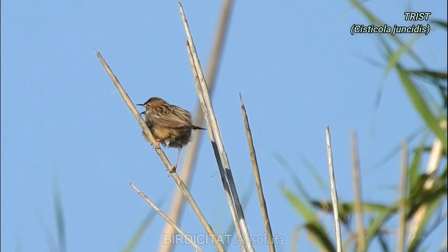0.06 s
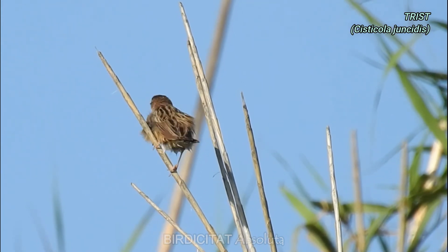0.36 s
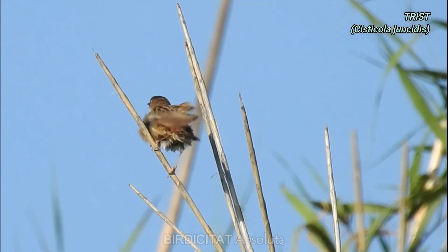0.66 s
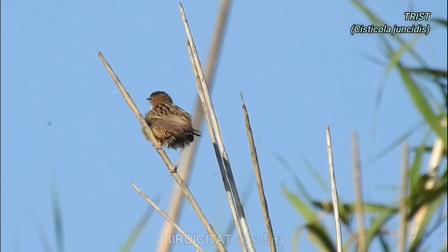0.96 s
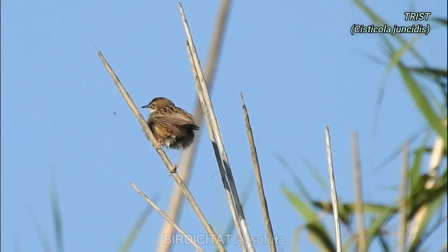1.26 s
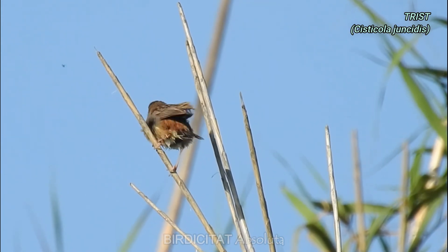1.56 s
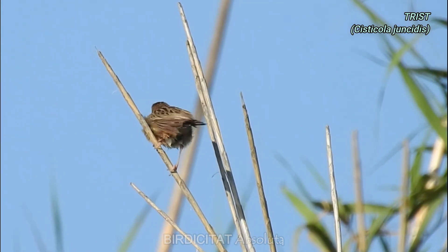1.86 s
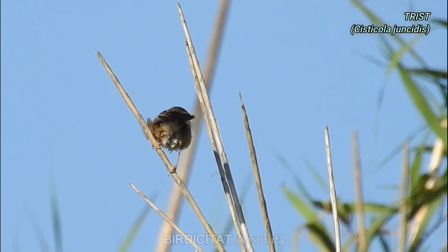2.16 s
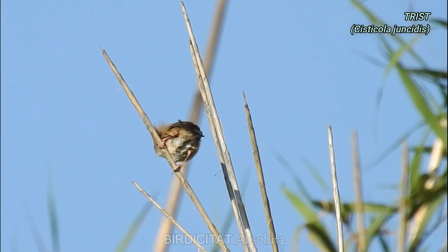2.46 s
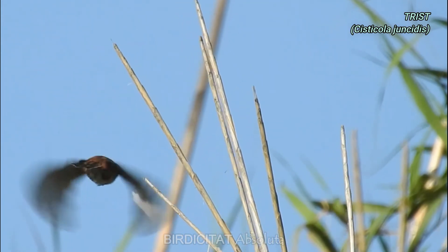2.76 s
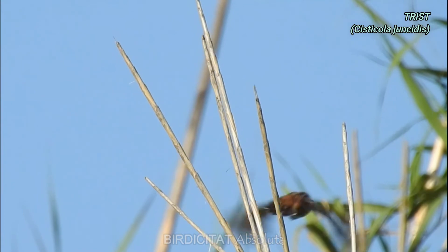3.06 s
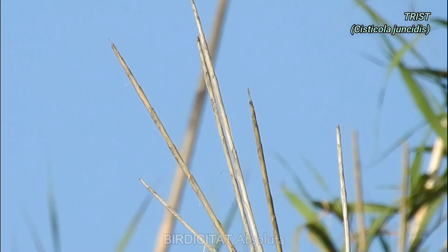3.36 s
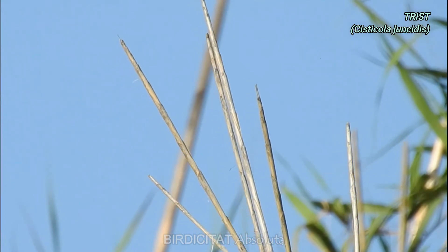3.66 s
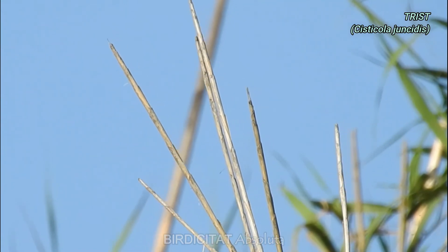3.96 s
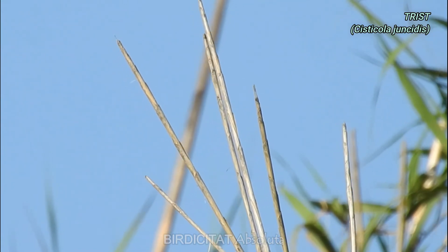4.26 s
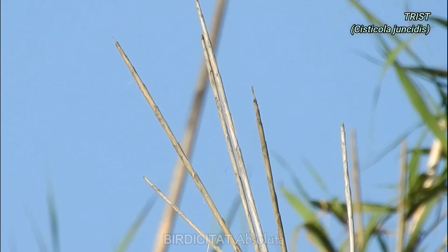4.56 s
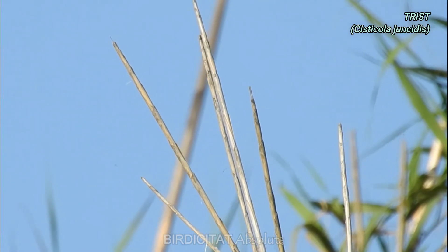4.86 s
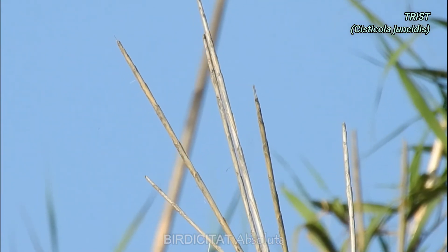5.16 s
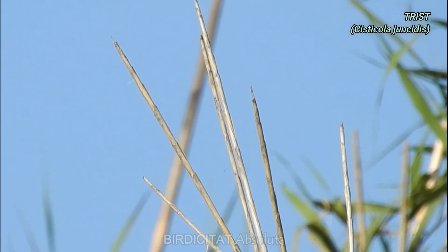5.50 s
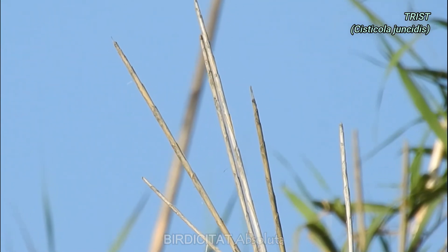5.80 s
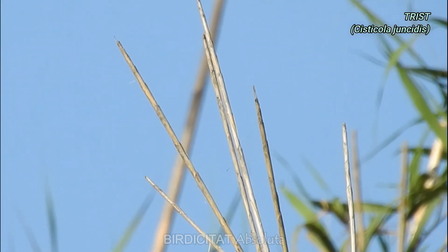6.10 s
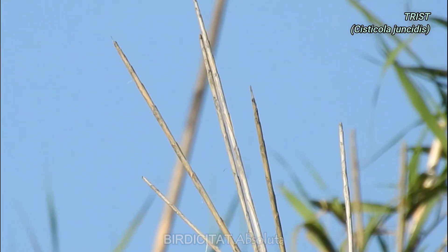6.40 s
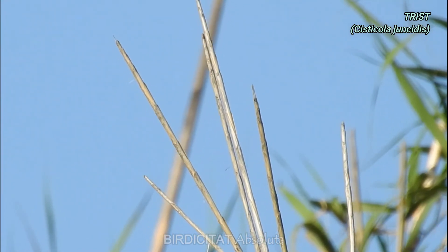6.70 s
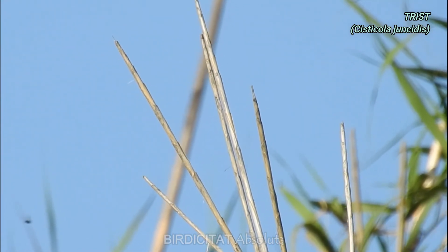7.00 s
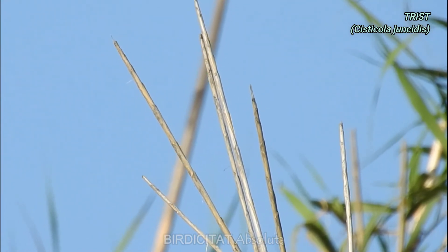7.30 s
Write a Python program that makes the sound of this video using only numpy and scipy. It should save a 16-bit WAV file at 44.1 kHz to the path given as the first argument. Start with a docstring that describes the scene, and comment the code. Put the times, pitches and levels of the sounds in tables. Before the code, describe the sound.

A small bird close to the microphone in a reed bed gives eight sharp, very high calls, each a quick tick running into a tiny falling whistle. The first three are widely spaced, then they come about twice as often and soften slightly. A second bird gives harsh chips at the start. Farther off, other birds chirp, buzz and whistle over a very faint distant rush in still air.

```python
"""A small bird in a reed bed, close to the microphone, gives eight sharp high calls: two ticks, then
an arched whistle that falls away, sung with both sides of the syrinx. Farther off, other birds chip,
chirp, buzz and whistle. The reed stems scatter every call into a short tail, different on the left
and right. Behind it all lie a faint distant rush, a thin hum and still air."""
import sys
import numpy as np
from scipy import signal
from scipy.fft import rfft, irfft, next_fast_len
from scipy.io import wavfile
from scipy.ndimage import uniform_filter1d, map_coordinates

SR = 44100
rng = np.random.default_rng(int(sys.argv[2]) if len(sys.argv) > 2 else 0)


def log_audio(samples):
    """Write samples as a 16-bit WAV file to the path given in sys.argv[1]."""
    # one column per channel
    frames = np.atleast_2d(samples).T
    # limit to full scale, then quantise
    limited = np.clip(frames, -1, 1)
    pcm = np.round(limited * 32767).astype(np.int16)
    wavfile.write(sys.argv[1], SR, pcm)


N = 323694

# spectra of the distant rush and of the air at the microphone: (frequency [Hz], relative density [dB])
RUSH_SPECTRUM = [(210, -44), (350, -15.5), (432, -28.5), (568, -14), (920, -7.5), (958, -3.5), (1340, -1.5),
                 (1980, -11.5), (2400, -15.5), (3120, -37.5), (5280, -120)]
AIR_SPECTRUM = [(20, -20), (50, 0.5), (70, -2.5), (115, -13.5), (175, -1.5), (230, -9.5), (500, -12.5),
                (2000, -6.5), (4300, -4.5), (6500, -6.5), (9500, -11), (12000, -15), (15500, -21.5)]
# how alike the noise is left and right: (frequency [Hz], correlation [0-1])
STEREO_LIKENESS = [(60, .45), (130, .6), (290, .84), (650, .91), (1430, .85), (3170, .45), (7010, .1)]
# surges of the rush: (crest time [s], rise [s], fall [s], level [dB])
RUSH_SURGES = [(.47, 0.49, .2, -59.5), (1.52, 0.23, 0.24, -71), (2.75, 0.28, 0.29, -77),
               (4.051, 0.28, .45, -74.5), (5.68, 0.098, .45, -71.5)]
# soft low swells: (time [s], width [s], centre [Hz], level [dB])
LOW_SWELLS = [(.22, .13, 150, -77), (1.63, .11, 407.3, -79.5)]
# the hum's two tones: (pitch [Hz], level [dB])
HUM_TONES = [(990, -83), (1487, -80.5)]
# the tail scattered by the stems: (delay [s], relative level [dB])
REED_TAIL = [(.003, 4), (.015, -3), (.04, -9), (.08, -14.5), (.15, -19.5), (.22, -27.5), (.32, -49.5),
             (.4, -57.5)]
# far buzzes: (time [s], length [s], pitch [Hz], swing [Hz], level [dB], low voice's gain [0-1],
# low voice's pitch drop [share])
BUZZES = [(.0, 0.035, 4830, 595, -55.5, 0.4, 0.1), (0.489, 0.044, 3500, 346, -47.5, 0, 0),
          (0.867, 0.12, 5000, 800, -42.5, 0.35, 0.3), (1.678, 0.18, 4800, 892, -53.5, 0, 0),
          (2.889, .17, 4714, 720, -54, 0.02, 0), (4.239, .11, 4964, 821, -39.5, 0.57, 0.3),
          (4.324, .16, 5650, 1157, -46, 0.1, 0), (4.408, .185, 4610, 521, -40.5, 0.01, 0.063),
          (5.613, .19, 4300, 517.9, -54, 0.11, 0.28)]
# two far slurred whistles: (time [s], pitch [Hz], level before gain [dB])
SINKING_SLUR = [(0.17, 2759, -82.5), (0.178, 2778, -73.5), (0.214, 2719, -60.5), (0.236, 2881, -57),
                (0.296, 2416, -57.5), (0.345, 2307, -60.5)]
ARCHED_SLUR = [(2.785, 4682, -68.5), (2.799, 5174, -54), (2.833, 5850, -63.5), (2.889, 5948, -60),
               (2.915, 5603, -51), (2.923, 5327, -45), (2.941, 4734, -49), (2.975, 4109, -51.5)]
# far chirps: (time [s], length [s], start pitch [Hz], end pitch [Hz], level [dB], upper voice [0-1])
CHIRPS = [(0.065, 0.0053, 3480, 2800, -48, 0), (.115, .057, 4360, 4450, -66, .3),
          (0.786, 0.027, 4390, 4920, -41.5, 0.04), (.807, 0.0072, 2800, 5200, -42, 0.11),
          (1.136, 0.051, 3610, 3160, -62, 0), (1.428, 0.069, 6250, 5610, -60, 0.01),
          (1.631, 0.054, 3086, 3410, -62, .7), (2.044, 0.011, 5000, 5900, -46, 0.05),
          (2.203, 0.027, 2680, 3426, -54, 0), (2.392, .08, 5520, 4680, -71, 0),
          (2.661, 0.067, 2576, 3630, -58, 0.05), (2.719, 0.064, 3277, 3330, -65.5, 0.14),
          (3.123, 0.046, 3450, 3449, -61, 0.23), (3.603, 0.076, 3480, 3450, -63.5, 0.83),
          (3.751, .15, 4150, 4050, -68, 0.4), (4.005, .07, 3840, 3040, -59.5, 0.64),
          (4.087, 0.047, 3330, 4520, -54, .5), (4.697, .016, 4010, 4720, -47, 0.02),
          (4.767, 0.018, 3555, 2358, -55.5, 0.08), (5.02, 0.041, 3630, 3160, -63, 0.4),
          (5.28, .07, 4230, 3396, -67.5, 0.27), (5.429, 0.12, 3090, 3580, -66, 0.37),
          (5.991, 0.056, 4060, 3330, -63.5, 0.01), (6.045, 0.056, 3300, 3090, -59.5, 0.1),
          (7.075, .05, 4560, 4550, -52.5, 0.08)]
# fainter chirps arrive with more scatter: (chirp level [dB], scatter over direct sound [dB])
CHIRP_SCATTER = [(-66, 2.5), (-51, -0.5), (-44.5, -3.5)]
# a second bird's harsh chips: (time [s], throat resonance [Hz], level [dB])
CHIPS = [(0.04, 4710, -29), (0.073, 4660, -27), (0.381, 4570, -33), (.420, 4600, -31.5), (0.546, 4630, -31),
         (0.5948, 4510, -30.5), (0.6424, 4430, -35), (0.672, 3820, -40), (.694, 3840, -44)]
# the near bird's calls: (whistle onset [s], length [s], top pitch [Hz], tick [dB], attack [dB],
# hold [dB], fall [dB], left over right [dB])
NEAR_CALLS = [(0.33, 0.062, 7418, -12, -15, -18.5, -13, .9),
              (1.884, 0.062, 7482, -13, -11.5, -19, -11.5, 1), (3.4497, 0.063, 7292, -14, -12, -18, -16, 1),
              (4.160, 0.061, 7408, -13.5, -15, -21.5, -14.5, 0.3),
              (4.908, 0.059, 7370, -18, -17, -22.5, -16.5, .5),
              (5.574, .061, 7396, -17.5, -15.5, -23.5, -17, .2),
              (6.292, 0.062, 7433, -21, -15.5, -26.5, -18.5, 0),
              (7.044, .061, 7330, -17, -14.5, -28.5, -21, -1.5)]
# its tick: (time from centre [s], pitch over top pitch [ratio], relative level [dB])
TICK_SHAPE = [(-.0026, .56, -48), (-.0013, .76, -11), (-.0004, .93, -2), (.0006, .965, -1.5),
              (.0019, .89, -4.5), (.0027, .8, -18.5), (.004, .72, -50)]
# its whistle, before stretching to each call's length: (time [s], pitch over top pitch [ratio])
WHISTLE_ARCH = [(-.0014, .54), (0, .82), (.001, .968), (.004, .955), (.011, 1.0), (.025, .992), (.04, .97),
                (.047, .918), (.054, .835), (.061, .76)]
# the syrinx's other side falls earlier: (time [s], pitch over top pitch [ratio], level over hold [dB])
SECOND_VOICE = [(.02, .96, -38.5), (.029, .88, -18), (.037, .82, -15.5), (.044, .77, -18.5),
                (.052, .7, -35.5)]


def amp(db):
    """Decibels to amplitude."""
    return 10 ** (np.asarray(db) / 20)


def along(points, hz):
    """Read (Hz, value) points on a log frequency axis."""
    knots_hz, values = np.transpose(points)
    return np.interp(np.log(hz + 1), np.log(knots_hz + 1), values)


def curves(rows, t):
    """Each column after the first, read at t."""
    times, *columns = np.transpose(rows)
    return [np.interp(t, times, column) for column in columns]


def wobble(t, rate):
    """A smooth random curve, rate knots a second."""
    return map_coordinates(rng.standard_normal(2048), [(t - t[0]) * rate], mode='wrap')


def filtered(x, response):
    """Filter x by a gain that depends on frequency."""
    size = next_fast_len(N + SR // 2)
    return irfft(rfft(x, size) * response(np.fft.rfftfreq(size, 1 / SR)), size)[..., :N]


def tone(hz):
    """A sine that follows a pitch curve."""
    return np.sin(2 * np.pi * np.cumsum(hz) / SR)


def add(track, s, sound):
    """Mix a stereo sound in at time s."""
    part = track[:, max(round(s * SR), 0):][:, :sound.shape[1]]
    part += sound[:, :part.shape[1]]


def noise(spectrum):
    """Coloured stereo noise of rms 1, most alike left and right in the midrange."""
    def mid_side_gains(hz):
        angle = np.arccos(np.clip(along(STEREO_LIKENESS, hz), -1, 1)) / 2
        return amp(along(spectrum, hz)) * [np.cos(angle), np.sin(angle)]
    mid, side = filtered(rng.standard_normal((2, N)), mid_side_gains)
    stereo = np.array([mid + side, mid - side])
    return stereo / np.sqrt(np.mean(stereo ** 2) + 1e-20)


def background(steady_db=-75.5, flutter_db=1.4):
    """A fluttering distant rush, two low swells and a wavering hum, all slightly left, in still air."""
    t = np.arange(N) / SR
    surges = [amp(db) * np.exp(-((t - s) / np.where(t < s, rise, fall)) ** 2)
              for s, rise, fall, db in RUSH_SURGES]
    strength = np.sqrt(amp(steady_db) ** 2 + np.sum(np.square(surges), axis=0))
    rush = strength * amp(flutter_db * wobble(t, 7)) * noise(RUSH_SPECTRUM)
    swells = 0
    for s, width, hz, db in LOW_SWELLS:
        band = noise([(hz / 2, -20), (hz, 0), (2 * hz, -12), (6 * hz, -45)])
        swells += amp(db) * np.exp(-((t - s) / width) ** 2) * band
    hum = sum(amp(db + 2.2 * wobble(t, 4.8)) * tone(hz * (1 + .0036 * wobble(t, 6)))
              for hz, db in HUM_TONES)
    return (rush + hum + swells) * amp([[.6], [-.6]]) + amp(-73.5) * noise(AIR_SPECTRUM)


def among_reeds(sound, wet_db, side_db, fade_db_per_s=0):
    """A call reaches the microphone directly, then scattered from countless stems."""
    t = np.arange(SR * 2 // 5) / SR
    tail = amp(curves(REED_TAIL, t)[0] - fade_db_per_s * t) * (t > .002)
    mid, side = rng.standard_normal((2, len(t))) * tail / np.linalg.norm(tail)
    paths = amp(wet_db) * np.array([mid + amp(side_db) * side, mid - amp(side_db) * side])
    paths[:, 0] = 1  # the direct path
    return signal.fftconvolve(sound[None], paths, axes=1)


def far_voice(t, pitch, db, rough, rasp_db):
    """A far bird's slightly unsteady whistle, with raspy partials beside it."""
    pitch = pitch * (1 + rough * wobble(t, 700))
    rasp = tone(pitch * 2 / 3) + tone(pitch * 4 / 3) + .4 * tone(pitch * 5 / 3)
    return amp(db + 2.9 * wobble(t, 180)) * (tone(pitch) + amp(rasp_db) * rasp)


def glide(length, start_hz, end_hz, db, bow, swing_hz, rough, rasp_db, sweeps_per_s=82):
    """A note swells and fades while its pitch glides along a bow, swept up and down by swing_hz."""
    t = np.arange(max(int(length * SR), 16)) / SR
    progress = t / t[-1]
    arc = np.abs(np.sin(np.pi * progress))
    pitch = (start_hz + (end_hz - start_hz) * progress) * (1 + bow * arc)
    sweep = swing_hz * np.sin(2 * np.pi * sweeps_per_s * t + .77 * wobble(t, 70))
    return arc ** .48 * far_voice(t, pitch + sweep, db, rough, rasp_db)


def distant_chatter(count=50):
    """Many birds twitter at the edge of hearing, mostly scatter."""
    out = np.zeros((2, N))
    for when, span, height, bend, loud in rng.random((count, 5)):
        hz = 2700 + 2400 * height
        note = glide(.044 + .07 * span, hz, hz * (.86 + .45 * bend), -83.5 + 5 * loud,
                     bow=.055, swing_hz=240, rough=.03, rasp_db=-18.5)
        add(out, when * N / SR, among_reeds(note, wet_db=10.5, side_db=-3.5))
    return out


def buzzing_birds(sag=.09):
    """Far whistles sweep quickly up and down and sag; in the harsh ones a low voice lingers beneath."""
    out = np.zeros((2, N))
    throat = signal.butter(4, 6500, fs=SR, output='sos')  # a small throat dulls the low voice
    for s, length, hz, swing_hz, db, low_gain, drop in BUZZES:
        high = glide(length, hz * (1 + sag / 2), hz * (1 - sag / 2), db,
                     bow=0, swing_hz=swing_hz, rough=.041, rasp_db=-27.5)
        add(out, s, among_reeds(high, wet_db=-2, side_db=-.5, fade_db_per_s=29.5))
        for harmonic, partial_db in [(1, -2), (2, -4)]:
            start_hz = harmonic * hz * .77
            low = glide(1.7 * length, start_hz, start_hz * (1 - drop), db + partial_db,
                        bow=0, swing_hz=harmonic * swing_hz * .52, rough=.04, rasp_db=-21)
            low = low_gain * signal.sosfilt(throat, low)
            add(out, s, among_reeds(low, wet_db=-1, side_db=-2, fade_db_per_s=37))
    return out


def slurred_whistle(path, gain_db, rough, wet_db):
    """One long far whistle follows a path of pitch and level."""
    out, t = np.zeros((2, N)), np.arange(path[0][0], path[-1][0], 1 / SR)
    pitch, db = curves(path, t)
    note = far_voice(t, pitch, db + gain_db, rough, rasp_db=-37) * signal.windows.tukey(len(t), .1)
    add(out, t[0], among_reeds(note, wet_db, side_db=1.5, fade_db_per_s=18.5))
    return out


def chirping_birds(upper_ratio=1.17):
    """Two-voiced chirps from deeper in the reeds, each one bowed glide."""
    out = np.zeros((2, N))
    for s, length, start_hz, end_hz, db, upper_gain in CHIRPS:
        wet_db, = curves(CHIRP_SCATTER, db)
        note = sum(gain * glide(length, ratio * start_hz, ratio * end_hz, db,
                                bow=.06, swing_hz=0, rough=.018, rasp_db=-31)
                   for ratio, gain in [(1, 1), (upper_ratio, upper_gain)])
        chirp = among_reeds(note, wet_db, side_db=-1, fade_db_per_s=12)
        add(out, s, chirp / np.hypot(1, amp(wet_db)))
    return out


def chipping_bird():
    """In the middle distance, abrupt stacks of harmonics fall fast through one throat resonance."""
    out, t = np.zeros((2, N)), np.arange(SR // 40) / SR
    blow_db, = curves([(0, -24), (.0015, -1.5), (.006, -4.5), (.011, -8), (.018, -22), (.025, -40)], t)
    for s, throat_hz, db in CHIPS:
        pitch = (780 + 850 * np.exp(-t / .0098)) * (1 + .024 * wobble(t, 450))
        throat = lambda hz: 1 / (1 + ((hz - throat_hz) / 480) ** 2) / (1 + (hz / 7200) ** 20)
        chip = amp(db + blow_db) * sum(tone(k * pitch) * throat(k * pitch) for k in range(2, 8))
        add(out, s, among_reeds(chip, wet_db=-2.5, side_db=-3.5, fade_db_per_s=14.5))
    return out


def tick(t, top_hz, db):
    """A few milliseconds of tone, flicked up and down in pitch around t = 0."""
    ratio, shape_db = curves(TICK_SHAPE, t)
    opening = amp(db + shape_db) * (t > TICK_SHAPE[0][0]) * (t < TICK_SHAPE[-1][0])
    return uniform_filter1d(opening, size=20) * tone(top_hz * ratio)


def arched_whistle(t, length, top_hz, attack_db, hold_db, fall_db):
    """One side of the syrinx arches and swells as it falls; the other side falls earlier."""
    age = t * .061 / length  # the shapes span a 61 ms whistle
    effort = [(-.0025, -81.5), (-.0008, attack_db - 21.5), (.0005, attack_db), (.004, attack_db - 2.5),
              (.01, hold_db - 2), (.028, hold_db - .5), (.04, hold_db), (.0475, fall_db),
              (.054, fall_db - .5), (.059, fall_db - 6.5), (.062, fall_db - 18), (.066, -79.5)]
    pitch = top_hz * curves(WHISTLE_ARCH, age)[0] * (1 + .003 * wobble(t, 500))
    envelope = uniform_filter1d(amp(curves(effort, age)[0] + .72 * wobble(t, 250)), size=20)
    second_ratio, second_db = curves(SECOND_VOICE, age)
    second_open = (age > SECOND_VOICE[0][0]) * (age < SECOND_VOICE[-1][0])
    return envelope * tone(pitch) + amp(hold_db + second_db) * second_open * tone(top_hz * second_ratio)


def side_tones(voice, t, shift_hz=3877):
    """Faint copies of the call's high part sound one shift below it, and one and two shifts above."""
    hz = np.fft.rfftfreq(len(t), 1 / SR)
    high = irfft(rfft(voice) / (1 + (5700 / (hz + 1)) ** 20), len(t))
    shift = np.exp(2j * np.pi * shift_hz * t)
    copies = amp(-35) / shift + amp(-38.5) * shift + amp(-49) * shift ** 2
    return np.real(signal.hilbert(high) * copies)


def near_bird():
    """Close to the microphone: a soft tick, a loud tick, then the two-voiced whistle."""
    out, t = np.zeros((2, N)), np.arange(-SR // 20, SR // 12) / SR
    for s, length, top_hz, tick_db, attack_db, hold_db, fall_db, pan_db in NEAR_CALLS:
        voice = tick(t + .0362, top_hz, tick_db - 19.5) + tick(t + .0188, top_hz, tick_db)
        voice += arched_whistle(t, length, top_hz, attack_db, hold_db, fall_db)
        call = among_reeds(voice, wet_db=-9.5, side_db=-1)
        call += among_reeds(side_tones(voice, t), wet_db=-4, side_db=-3.5)
        add(out, s + t[0], call * amp([[pan_db / 2], [-pan_db / 2]]))
    return out


def scene():
    """The reed bed from one spot: the near bird over the farther birds and the background."""
    slurs = slurred_whistle(SINKING_SLUR, gain_db=3.5, rough=.011, wet_db=-4.5)
    slurs += slurred_whistle(ARCHED_SLUR, gain_db=0, rough=.0195, wet_db=1)
    birds = near_bird() + chipping_bird() + chirping_birds() + slurs + buzzing_birds()
    return birds + distant_chatter() + background()


def record(dry):
    """The recorder keeps nothing above its band limit."""
    limit_hz = 15700
    return filtered(dry, lambda hz: 1 / (1 + (hz / limit_hz) ** 200))


dry = scene()
out = record(dry)
log_audio(out)
```